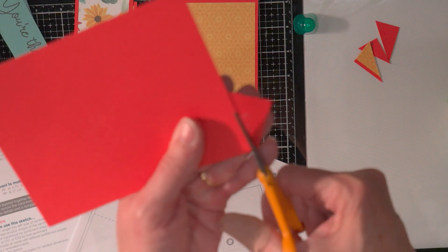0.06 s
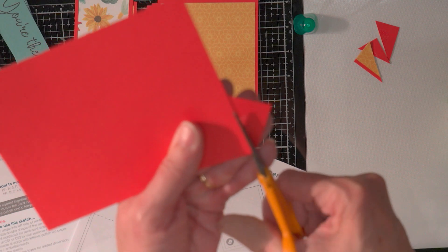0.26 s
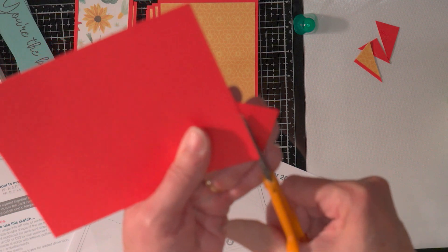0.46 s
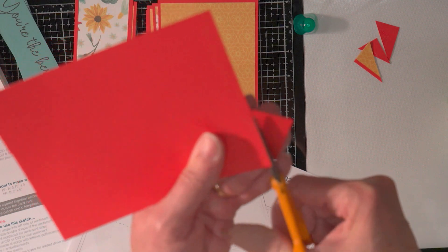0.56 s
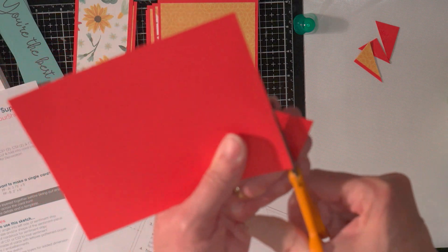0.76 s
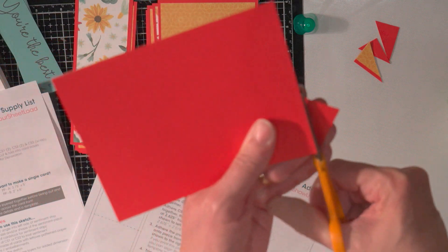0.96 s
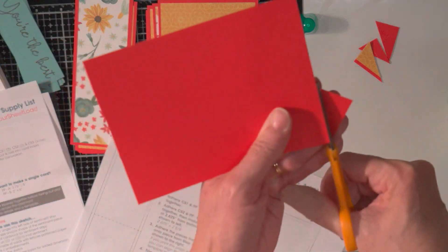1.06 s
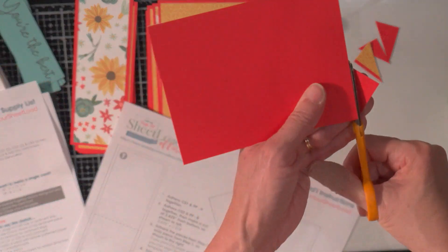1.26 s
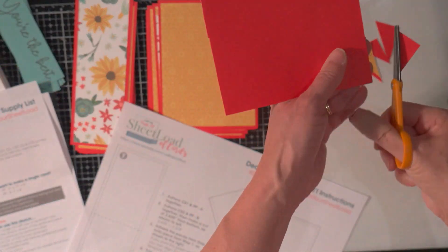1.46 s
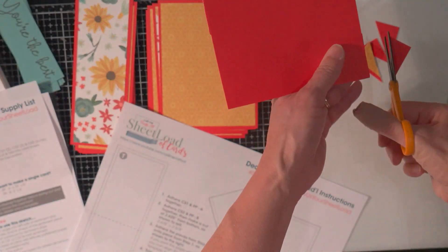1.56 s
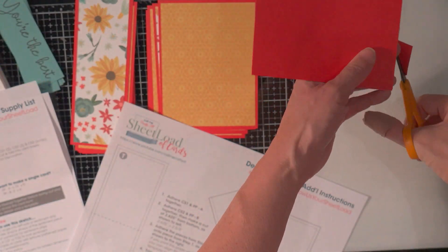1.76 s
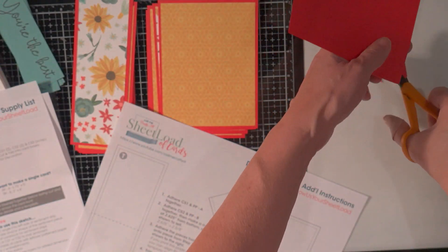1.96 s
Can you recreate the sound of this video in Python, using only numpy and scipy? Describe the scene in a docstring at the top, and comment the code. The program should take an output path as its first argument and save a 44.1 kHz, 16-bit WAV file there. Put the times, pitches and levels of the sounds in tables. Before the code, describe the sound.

Close to the microphone in a small room, scissor blades bite jerkily into stiff card with a faint squeak. They break through and snap shut sharply, leaving a few light ticks and rubs over faint hiss.

```python
"""Scissor blades bite through stiff card in short jerks, with a faint squeak of the pivot and a slide along
the sheet, then snap shut; a few soft ticks and scrapes follow. Each jerk tears fibres and rings card and
blades; the snap is a quick run of metal contacts. Heard close up, on the two microphones of a phone above
a craft table in a small furnished room, over room air, microphone hiss and mains hum."""
import sys
import numpy as np
from scipy import signal
from scipy.fft import rfft, irfft
from scipy.io import wavfile
from scipy.ndimage import uniform_filter1d

SR = 44100
rng = np.random.default_rng(int(sys.argv[2]) if len(sys.argv) > 2 else 0)


def dump(signal):
    """Clip the signal to [-1, 1] and save it as 16-bit WAV at the path in sys.argv[1]."""
    limited = np.clip(np.atleast_2d(signal).T, -1, 1)
    pcm = np.round(limited * 32767).astype(np.int16)
    wavfile.write(sys.argv[1], SR, pcm)


N = 88861

# jerks in the card (time [s], level [dB], strongest ring [Hz], length [s], share of that ring [dB])
BITES = [(.046, -44, 1540, 0.0046, -6), (0.069, -48, 2400, 0.004, -1.5), (0.1052, -42, 4150, 0.0042, -24),
         (0.133, -49, 4120, 0.004, 3), (.162, -46, 4100, 0.004, -9), (0.1823, -40.5, 4130, 0.0034, -2),
         (0.219, -48.5, 4200, 0.0035, -6), (.282, -38, 4350, 0.0052, -18), (.300, -43, 5200, 0.0051, 0.5),
         (.334, -36.5, 2560, 0.0058, -12.5), (0.3562, -35.5, 4680, 0.0039, -3.5),
         (.373, -39, 4250, 0.0045, -11), (0.5813, -38, 8300, 0.00081, 0), (0.59, -35.5, 6740, 0.0042, -17),
         (0.6167, -38.5, 4850, 0.0048, -0.5), (0.633, -40, 3800, 0.0033, 1),
         (0.762, -45.5, 3520, 0.0032, -6), (0.889, -42, 4330, 0.0028, -1), (0.9155, -32, 1570, 0.0042, -6),
         (.938, -36.5, 4280, 0.0028, -1), (.9447, -37.5, 3870, 0.0049, 3), (0.959, -40, 3660, .006, 9),
         (.989, -44, 4460, 0.0031, -3), (1.007, -44.5, 3920, 0.0048, -1.5), (1.068, -44, 4280, 0.0032, 2.5),
         (1.447, -40, 6200, 0.0045, -6), (1.847, -47, 8370, 0.0035, -6), (1.866, -44, 3680, .003, -7.5),
         (1.983, -45, 2500, 0.0021, 0)]
# metal contacts (time [s], level [dB], length [s], bass edge [Hz], ring treble edge [Hz], crack share [dB])
SNAP_CONTACTS = [(1.1134, -22.5, 0.00033, 1500, 4970, -12), (1.1172, -39, 0.0004, 3000, 5000, -18),
                 (1.1723, -28.5, 0.0018, 1480, 4500, -8), (1.1748, -13.5, .0012, 1580, 11700, -1.5),
                 (1.1768, -13, 0.00088, 354, 18200, 0), (1.1789, -27.5, 0.0016, 1500, 17300, 7),
                 (1.181, -36, 0.016, 600, 3970, 4)]
# modes of scissors and card (frequency [Hz], level [dB], free t60 [s])
MODES = [(254, -9, 0.011), (542, -12, 0.063), (686, -9.5, 0.017), (1080, -21, 0.044), (1785, -10, 0.025),
         (2390, -22, 0.02), (2740, -7, 0.13), (3280, -20, 0.015), (3820, -8, 0.026), (4124, 2, 0.016),
         (4560, -4.5, 0.014), (4940, -11, 0.01), (6890, -5, 0.015), (7300, -6, 0.006)]
# blades and fingers on card (start [s], rise [s], hold [s], fall [s], level [dB], treble edge [Hz])
SLIDES = [(.0, 0.0074, 0.18, 0.065, -62, 9200), (0.262, 0.01, 0.12, 0.026, -62.5, 9250),
          (0.562, 0.025, 0.054, 0.031, -48, 14900), (0.737, 0.013, 0.0082, 0.025, -62.5, 7000),
          (0.897, 0.01, 0.1, 0.084, -64, 7000), (1.436, 0.0056, 0.026, 0.015, -60, 9100),
          (1.507, 0.021, 0.019, 0.025, -54, 3950), (1.845, 0.013, 0.022, 0.058, -64, 12000),
          (1.97, 0.021, 0.026, .02, -61, 9000)]
# spectra of tearing fibres, metal crack and sliding friction (frequency [Hz], level [dB])
TEAR_SPECTRUM = [(200, -10.5), (480, -2.5), (1100, -9), (2400, -3), (3300, -9), (4400, -0.5), (5700, -5),
                 (10000, -8), (15600, -21)]
CRACK_SPECTRUM = [(200, -12), (420, -19.5), (560, -4.5), (1400, -11.5), (2800, -1), (4500, -5.5),
                  (6200, -7.5), (8500, -8.5), (12500, -7), (15700, -19.5)]
SLIDE_SPECTRUM = [(120, -35), (200, -13), (601, -18.5), (821, -5.5), (1420, -4.5), (2800, -7.5), (4680, -4),
                  (7540, -3), (16000, -13)]
# course of the pivot squeak (time [s], pitch [Hz], level [dB])
SQUEAK = [(.012, 1110, -66), (0.019, 1145, -60), (0.06, 1163, -53), (0.093, 1064, -58.5), (.125, 1000, -69)]
# swell of the narrow hiss (time [s], level [dB])
NARROW_HISS = [(1.495, -73), (1.52, -60.5), (1.56, -68.5), (1.65, -68), (1.69, -86)]
# side over mid for sounds close to the microphones (frequency [Hz], level [dB])
SIDE_SPECTRUM = [(200, -27), (600, -17.5), (2400, -5.5), (5000, -10.5), (9000, 2.3), (15000, 2)]
# decay of the room (frequency [Hz], t60 [s])
ROOM_T60 = [(250, 0.076), (1000, 0.17), (3000, 0.15), (8000, 0.16), (15000, 0.13)]
# spectrum of room air and microphone hiss (frequency [Hz], level [dB])
AIR_SPECTRUM = [(15, -93), (25, -29), (87, -16), (120, -8.5), (212, -5.5), (489, -5), (531, -3), (1160, -7),
                (2550, -10.5), (16000, -16.5)]

BITE_BODY_DB, BITE_T60_S = -7, 0.012
BITE_RISE, CONTACT_RISE = 0.78, 0.077  # shares of a burst's length
GRIP_T60_S, BREAK_S = 0.025, 1.15  # pinched card damps the blades until they break through
SNAP_PAN_DB, SCATTER_S = -0.5, 0.00034
GRIT_PER_S, GRIT_DB, SLIDE_FLICKER_DB = 3500, 2.5, 2.0
BASS_CUT_HZ, TOP_HZ = 230, 15900
ROOM_DB, ROOM_DELAY_S, ROOM_BUILD_S = -10, 0.001, 0.0065
ROOM_ALIKE_HZ, AIR_ALIKE_HZ = 1100, 384  # left and right grow alike below these
AIR_DB, HUM_HZ, HUM_DB, HUM_WAVER_DB = -58, 120.2, -78, 3


def bites():
    """Close up, each jerk tears fibres for a few milliseconds and rings card and blades."""
    out = np.zeros((2, N))
    for at, db, hz, length, ring_db in BITES:
        push = burst(length, BITE_RISE, hard=False)
        tick = burst(length / 2, BITE_RISE / 2, hard=True)
        tear = colour(push, TEAR_SPECTRUM)
        ping = undb(ring_db) * ring(tick, hz, BITE_T60_S)
        ringing = undb(BITE_BODY_DB) * body(push, GRIP_T60_S)
        out = place(out, at - .001, microphones(tear + ping + ringing) * undb(db))
    return out


def snap():
    """The blades break through, the handles meet in a few quick contacts and the freed card shivers."""
    out = np.zeros((2, N))
    for at, db, length, low_hz, high_hz, crack_db in SNAP_CONTACTS:
        contact = burst(length, CONTACT_RISE, hard=True)
        contact = signal.lfilter(*signal.butter(2, low_hz, "highpass", fs=SR), contact)
        push = signal.lfilter(*signal.butter(2, high_hz, fs=SR), contact)
        ringing = body(push, GRIP_T60_S if at < BREAK_S else np.inf)
        crack = undb(crack_db) * colour(contact, CRACK_SPECTRUM)
        out = place(out, at, microphones(ringing + crack, SNAP_PAN_DB) * undb(db))
    return out


def body(push, longest_t60):
    """A push rings all modes of scissors and card; damping caps their decay time."""
    return sum(undb(db) * ring(push, hz, min(t60, longest_t60)) for hz, db, t60 in MODES) / 2


def slides(t):
    """Blades and fingers rub the card with a dense, flickering grit; soft contacts are duller."""
    grit = (rng.random(N) < GRIT_PER_S / SR) * rng.standard_normal(N)
    grit *= undb(GRIT_DB * rng.exponential(size=N))
    friction = unit(colour(unit(grit) + rng.standard_normal(N), SLIDE_SPECTRUM))
    friction *= undb(SLIDE_FLICKER_DB * wander(160))
    out = np.zeros(N)
    for start, rise, hold, fall, db, edge_hz in SLIDES:
        envelope = np.interp(t, np.cumsum([start, rise, hold, fall]), [0, 1, 1, 0])
        out += undb(db) * envelope * signal.lfilter(*signal.butter(2, edge_hz, fs=SR), friction)
    return microphones(out)


def pivot_squeak(t):
    """The pivot gives one thin, unsteady tone that lifts a little, then falls."""
    times, hz, db = np.array(SQUEAK).T
    pitch = np.interp(t, times, hz) * (1 + .004 * wander(200))
    level_db = np.interp(t, times, db, -150, -150) + 2.2 * wander(120)
    return np.sqrt(2) * np.sin(2 * np.pi * np.cumsum(pitch) / SR) * undb(level_db)


def narrow_hiss(t):
    """A faint, narrow band of noise swells and fades after the snap."""
    times, db = np.array(NARROW_HISS).T
    return ring(rng.standard_normal(N), hz=2560, t60=0.01) * undb(np.interp(t, times, db, -150, -150))


def microphones(x, pan_db=0):
    """Reflections off hands and table reach the two microphones differently, more so in the treble."""
    scatter = rng.standard_normal(256) * np.exp(-np.arange(256) / SR / SCATTER_S)
    scatter /= np.sqrt(np.sum(scatter ** 2))
    side = signal.fftconvolve(x, np.convolve(scatter, impulse_response(SIDE_SPECTRUM)))[:len(x)]
    return np.array([(x + side) * undb(pan_db / 2), (x - side) * undb(-pan_db / 2)])


def room(x):
    """The small room returns diffuse echoes, each octave dying at its own rate, wider in the treble."""
    t = np.arange(12000) / SR
    tail = 0
    for hz in 250 * 2. ** np.arange(7):
        octave = signal.butter(2, [hz / 1.41, min(hz * 1.41, 21000)], "bandpass", fs=SR, output="sos")
        decay = undb(-60 * t / value_at(ROOM_T60, hz))
        tail = tail + signal.sosfilt(octave, rng.standard_normal((2, len(t)))) * decay
    mid, side = tail
    side = signal.lfilter(*signal.butter(1, ROOM_ALIKE_HZ, "highpass", fs=SR), side)
    tail = np.array([mid + side, mid - side]) * np.clip((t - ROOM_DELAY_S) / ROOM_BUILD_S, 0, 1)
    tail /= np.sqrt(np.sum(tail ** 2) / 2)
    return signal.fftconvolve(x, tail, axes=1)[:, :N] * undb(ROOM_DB)


def room_tone(t):
    """Room air and microphone hiss, alike in both channels only in the bass, with wavering mains hum."""
    mid, side = colour(rng.standard_normal((2, N)), AIR_SPECTRUM)
    side = signal.sosfilt(signal.butter(2, AIR_ALIKE_HZ, "highpass", fs=SR, output="sos"), side)
    hum = np.sqrt(2) * np.sin(2 * np.pi * HUM_HZ * t) * undb(HUM_DB + HUM_WAVER_DB * wander(17))
    return undb(AIR_DB + .5 * wander(8)) * np.array([mid + side, mid - side]) + hum


def burst(length_s, rise, hard):
    """A crackle that swells and stops; a hard contact has an even spectrum and dies away."""
    age = np.arange(4096) / SR / length_s
    envelope = (1 - np.exp(-age / rise)) * np.exp(-age if hard else -age ** 2)
    noise = rng.standard_normal(len(age)) * envelope
    if hard:
        spectrum = rfft(noise)
        noise = irfft(spectrum / np.abs(spectrum)) * np.sqrt(envelope)
    return unit(noise) * np.sqrt(np.mean(envelope ** 2))  # energy follows length


def ring(x, hz, t60):
    """One decaying mode with unit power gain."""
    radius = np.exp(-np.log(1000) / (t60 * SR))
    angle = 2 * np.pi * hz / SR
    gain = np.sqrt(4 * (1 - radius)) * np.sin(angle)
    return signal.lfilter([0, gain], [1, -2 * radius * np.cos(angle), radius ** 2], x)


def colour(x, spectrum):
    """Filters with the given spectrum at unit power gain."""
    response = impulse_response(spectrum)
    response /= np.sqrt(np.sum(response ** 2))
    return signal.fftconvolve(x, np.array(response, ndmin=x.ndim), axes=-1)[..., :x.shape[-1]]


def impulse_response(spectrum):
    """Minimum-phase response of a spectrum, by folding its cepstrum."""
    cepstrum = irfft(np.log(undb(value_at(spectrum, np.arange(1025) * SR / 2048))))
    cepstrum[1:1024] *= 2
    cepstrum[1025:] = 0
    return irfft(np.exp(rfft(cepstrum)))


def value_at(rows, hz):
    """Reads (frequency, value) rows on a log-frequency axis."""
    frequencies, values = np.array(rows).T
    return np.interp(np.log(np.maximum(hz, 1)), np.log(frequencies), values)


def wander(rate_hz):
    """Smooth random drift, spread 1."""
    width = int(SR / rate_hz)
    return unit(uniform_filter1d(uniform_filter1d(rng.standard_normal(N), width), width))


def place(out, start_s, x):
    """Returns out plus x starting at start_s."""
    start = int(start_s * SR)
    padded = np.zeros_like(out)
    padded[:, start:start + x.shape[1]] = x[:, :N - start]
    return out + padded


def undb(db):
    return 10 ** (np.asarray(db) / 20)


def unit(x):
    return x / np.sqrt(np.mean(x ** 2))


def scene():
    """Scissors close to the microphones, the room's echoes and room tone behind them."""
    t = np.arange(N) / SR
    near = bites() + snap() + slides(t) + pivot_squeak(t) + narrow_hiss(t)
    bass_cut = signal.butter(6, BASS_CUT_HZ, "highpass", fs=SR, output="sos")
    near = signal.sosfilt(bass_cut, near)  # small things radiate no bass
    return near + room(near) + room_tone(t)


def record(dry):
    """The phone cuts the top treble steeply."""
    return signal.sosfilt(signal.ellip(10, .2, 70, TOP_HZ, fs=SR, output="sos"), dry)


dry = scene()
out = record(dry)
dump(out)
```